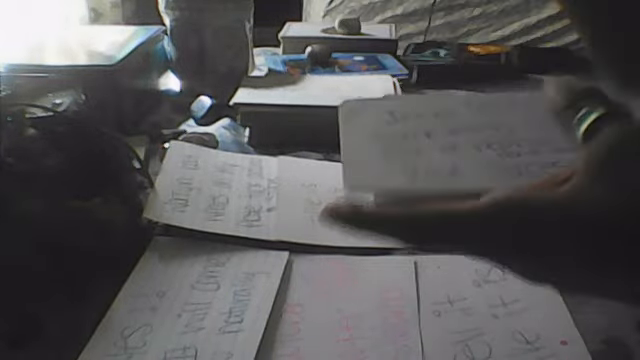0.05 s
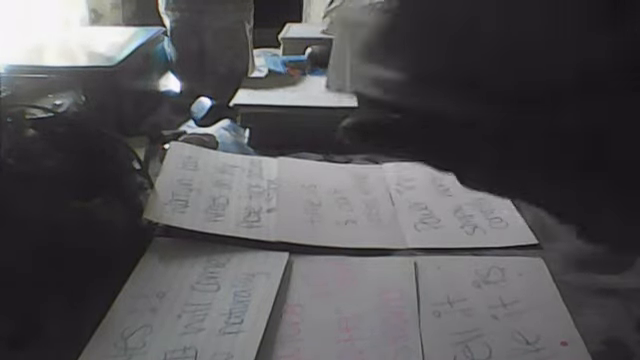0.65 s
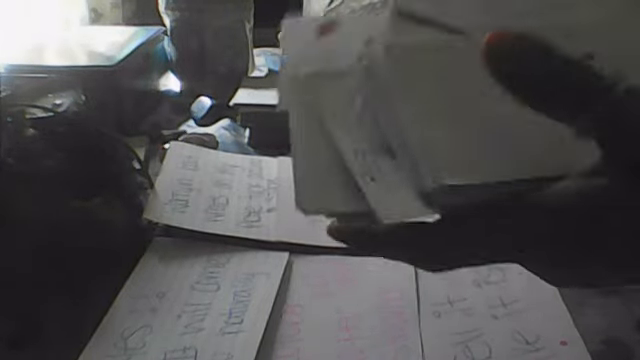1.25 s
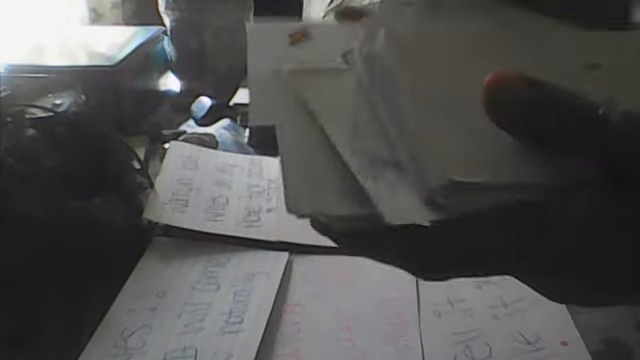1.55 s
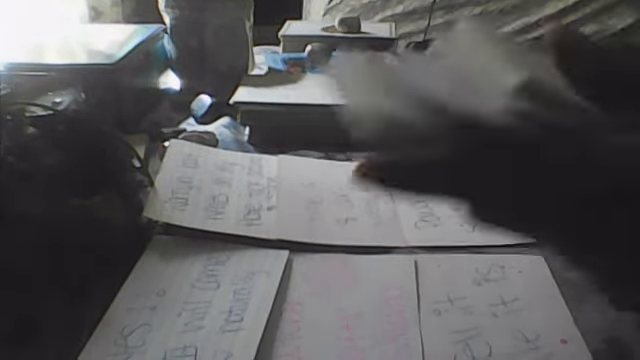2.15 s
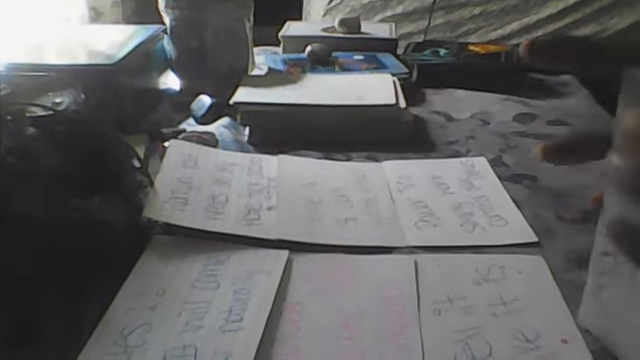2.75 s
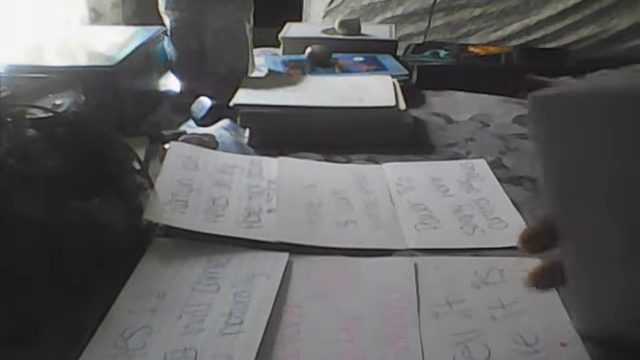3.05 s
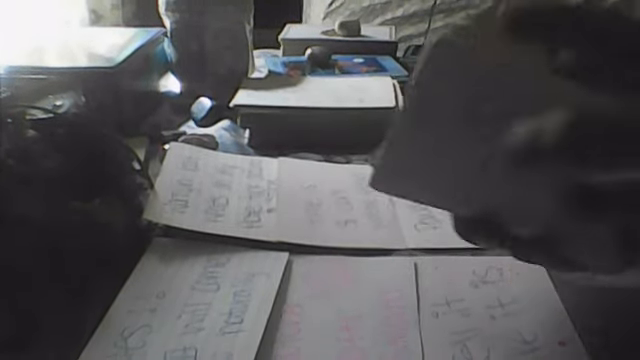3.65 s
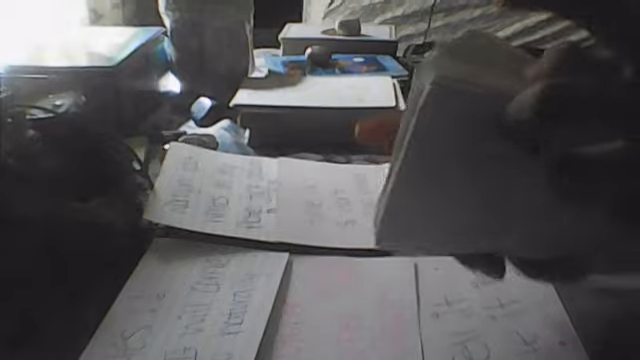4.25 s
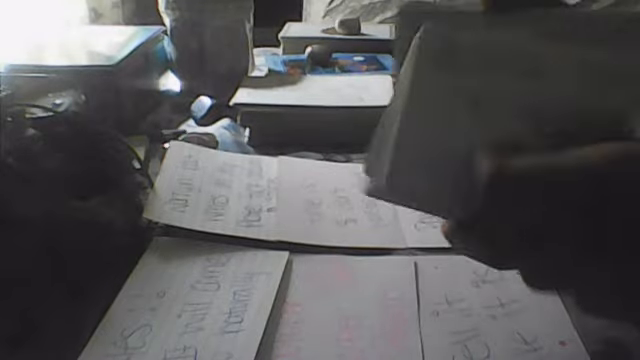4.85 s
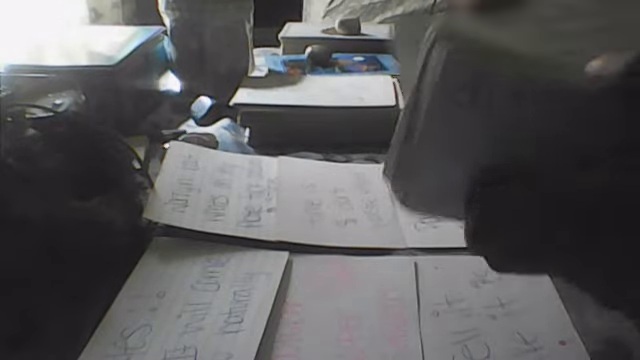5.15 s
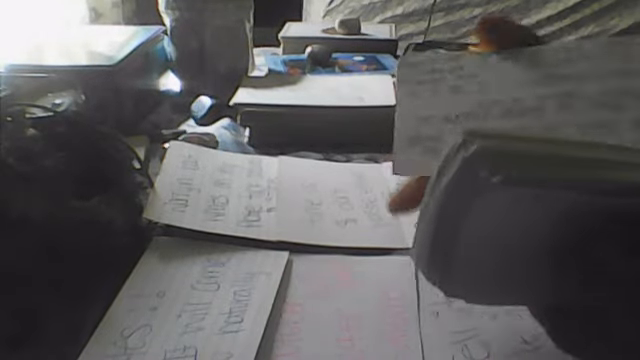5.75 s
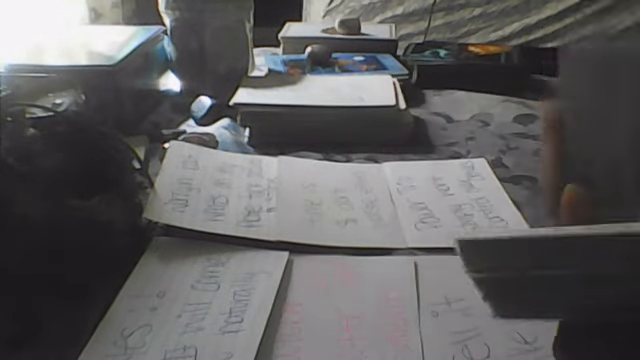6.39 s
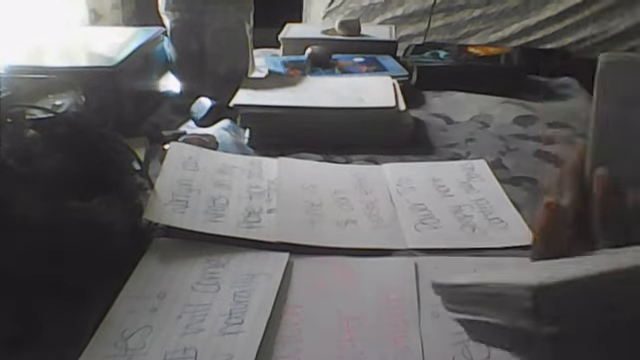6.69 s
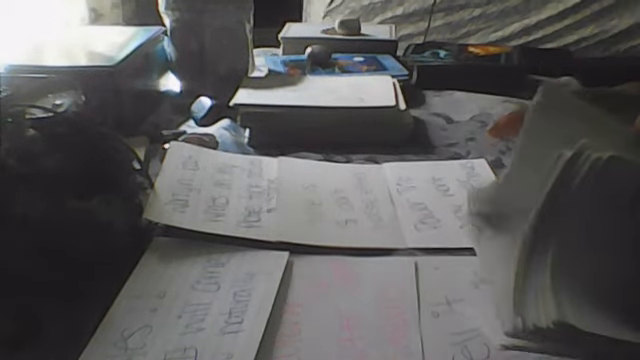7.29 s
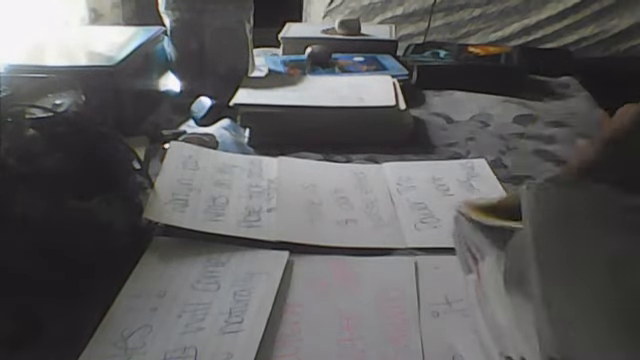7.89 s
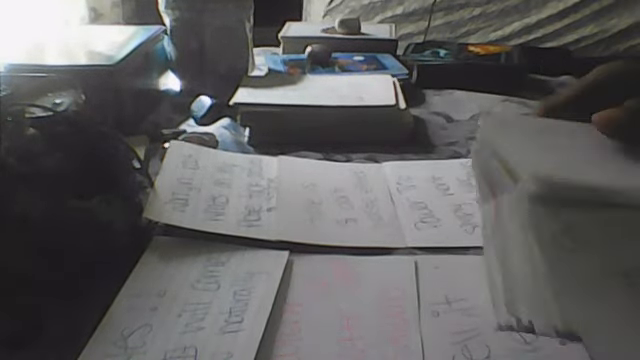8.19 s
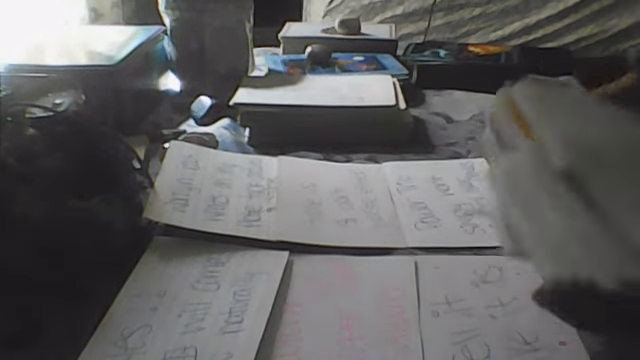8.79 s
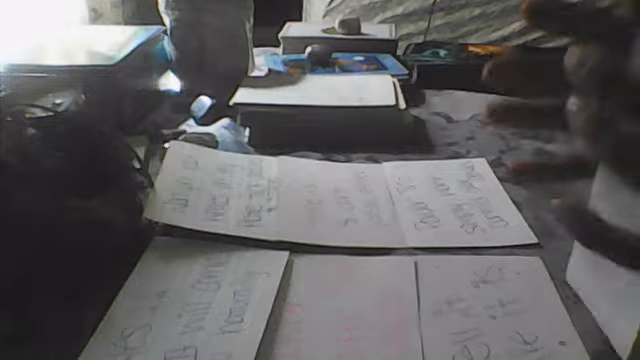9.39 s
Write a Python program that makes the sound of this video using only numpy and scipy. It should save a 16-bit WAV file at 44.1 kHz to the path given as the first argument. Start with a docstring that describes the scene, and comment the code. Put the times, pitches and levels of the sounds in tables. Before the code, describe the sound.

A fan hums low and steady in a small room throughout, while a deck of cards is handled close to a microphone standing on the table. For the first 2.4 seconds, cards slide over each other in short papery swishes, with small edge snaps and faint squeaks. At about 2.6 seconds the deck hits the table in a loud, quick clatter that briefly rings the top. From 3 to 6 seconds there is quieter shifting, with a few soft slides, ticks and tiny squeaks. Three solid knocks land at about 6.2, 6.4 and 6.7 seconds. From 7 to 8 seconds the cards rub and their edges snap in a crisp flurry, strongest near 7.8. Soft sliding continues until just after 9 seconds. At about 9.4 seconds the deck comes down on the table with a sharp, loud clack.

```python
"""Tarot cards handled on a table.

Packets slide with a hiss of catching fibres, faces squeak faintly, edges slip free and snap.
The deck is knocked and set down, ringing the table top on which the small, close microphone stands.
A fan hums steadily in the small room; the recorder's gain dips after the loudest knocks."""
import sys
import numpy as np
from scipy import signal
from scipy.fft import rfft, irfft
from scipy.io import wavfile
from scipy.ndimage import uniform_filter1d

SR = 44100
rng = np.random.default_rng(int(sys.argv[2]) if len(sys.argv) > 2 else 0)


def to_wav(sig):
    """Store sig (one row per channel, or 1-D mono) as 16-bit WAV at the path in sys.argv[1].

    Samples outside -1..1 are clipped; the rate is SR.
    """
    pcm = np.clip(np.atleast_2d(sig), -1, 1) * 32767
    pcm = np.round(pcm).astype(np.int16)
    wavfile.write(sys.argv[1], SR, pcm.T)  # frames by channels


N = 420273

# Spectrum of a snapping card edge. Each row: frequency in Hz, relative density in dB.
EDGE_SPECTRUM = [(500, 8), (2000, 6.5), (3500, 4), (5500, 4.5), (7500, 1), (10000, -0.5), (14000, -0.5)]
# Spells of fingers lightly shifting the cards. Each row: start in seconds, end in seconds, level in dB.
SHIFT_SPELLS = [(0.792, 1.2, -68), (2.784, 3.417, -57), (4.144, 4.5, -60), (4.985, 5.2, -63),
                (5.38, 5.55, -60.5), (6.493, 6.648, -57.5), (6.821, 7.072, -59.5), (7.298, 7.716, -57),
                (7.953, 8.256, -55), (8.55, 8.87, -59)]


def undb(db):
    """Decibels to gain."""
    return 10 ** (np.asarray(db) / 20)


def unit(x):
    """Scale to rms 1."""
    return x / np.sqrt(np.mean(x ** 2))


def fade(t, t60_s):
    """Decay by 60 dB in t60_s."""
    return np.exp(-np.log(1000) * t / max(t60_s, 1e-4))


def add(track, start_s, sound):
    """Mix a sound into the track."""
    i = max(int(start_s * SR), 0)
    track[i:i + len(sound)] += sound[:max(N - i, 0)]


def colour(x, points, size=4096):
    """Minimum-phase filter of unit power, shaped by (Hz, dB) points."""
    hz, db = np.transpose(points)
    bins_hz = np.arange(size // 2 + 1) * SR / size + 1
    gain = undb(np.interp(np.log(bins_hz), np.log(hz), db))
    cepstrum = irfft(np.log(gain))
    cepstrum[1:size // 2] *= 2
    cepstrum[size // 2 + 1:] = 0
    response = irfft(np.exp(rfft(cepstrum)))
    return signal.fftconvolve(x, response / np.linalg.norm(response))[:len(x)]


def resonate(x, hz, width_hz):
    """One resonance, gain 1 at its centre."""
    return signal.lfilter(*signal.iirpeak(min(hz, .45 * SR), hz / width_hz, fs=SR), x)


def band(x, hz, width_hz):
    """Two equal resonances in series."""
    return resonate(resonate(x, hz, width_hz), hz, width_hz)


def lowpass(x, hz, order=2):
    """Butterworth low-pass."""
    return signal.lfilter(*signal.butter(order, min(hz, .45 * SR), fs=SR), x)


def walk(rate_hz):
    """Smooth random wander, rms 1."""
    hold = max(int(SR / rate_hz), 1)
    steps = np.repeat(rng.standard_normal(N // hold + 1), hold)
    return unit(uniform_filter1d(steps, hold)[:N])


def fan(shaft_hz=43.59, drift=.0012, flutter_db=1.63, air_db=-48):
    """Shaft and blade tones over rushing air; the lowest tones flutter least."""
    # Fan tones. Each row: multiple of the shaft rate, rms level in dB.
    tones = [(1, -40.5), (2, -49), (4, -61), (6, -59.5), (8, -53), (8.25, -60), (9.5, -75.5), (10, -53),
             (10.5, -62), (12, -68), (14, -61.5), (18, -69)]
    # Fan air and microphone hiss. Each row: frequency in Hz, relative density in dB.
    air_spectrum = [(40, -6.5), (125, -2), (165, -2.5), (215, 0.5), (330, 0.5), (430, 2), (520, -2),
                    (640, 1), (800, -6.5), (1050, -4.5), (1200, -11.5), (1400, -6), (1750, -13),
                    (3200, -16.5), (7000, -26.5), (15000, -25.5)]
    # Low resonances stirred by the draught. Each row: centre in Hz, width in Hz, rms level in dB.
    rumbles = [(26.5, 9.9, -45.5), (58.7, 3.1, -51.5), (85.3, 32, -53.5), (392, 62, -57), (928, 255, -58)]
    angle = 2 * np.pi * np.cumsum(shaft_hz * (1 + drift * walk(3.054))) / SR
    out = undb(air_db) * colour(rng.standard_normal(N), air_spectrum)
    for multiple, db in tones:
        wobble_db = flutter_db * min(multiple / 4, 1) * walk(7.7)
        out += undb(db + wobble_db) * np.sqrt(2) * np.sin(multiple * angle + rng.uniform(0, 2 * np.pi))
    for hz, width_hz, db in rumbles:
        out += undb(db) * unit(band(rng.standard_normal(N), hz, width_hz))
    return out


def room(x, wet_db=-14, t60_s=0.38, gap_s=0.00317):
    """A small furnished room answers after a short gap."""
    # Room tail. Each row: frequency in Hz, relative density in dB.
    tail_spectrum = [(60, 4), (150, 8.5), (400, 6.5), (850, 6), (1400, 2), (3000, 3.5), (7000, 4),
                     (16000, -1)]
    t = np.arange(SR // 2) / SR
    tail = colour(rng.standard_normal(len(t)), tail_spectrum) * fade(t, t60_s) * (t > gap_s)
    return undb(wet_db) * signal.fftconvolve(x, tail / np.linalg.norm(tail))[:N]


def squeaks():
    """Card faces stick and slip unevenly: a hoarse, narrow tone swells and fades."""
    # Squeaks. Each row: middle and half-height length in seconds, centre and width in Hz, level in dB.
    chirps = [(.27, 0.33, 1108, 50, -52), (0.554, .012, 1120, 350, -38.5), (0.586, 0.055, 1420, 150, -50),
              (4.427, .04, 2230, 400, -48.5), (4.71, 0.013, 1450, 200, -43.5)]
    out = np.zeros(N)
    for middle_s, length_s, hz, width_hz, db in chirps:
        swell = np.hanning(int(2 * length_s * SR))
        tone = unit(band(rng.standard_normal(len(swell)), hz, width_hz))
        add(out, middle_s - length_s, undb(db) * swell * tone)
    return out


def packet(x):
    """The broad ring of a packet of cards held in the hand."""
    # Packet resonances. Each row: centre in Hz, width in Hz, gain in dB.
    modes = [(760, 325, 19.5), (1320, 280, 22), (2080, 250, 13.5), (2260, 510, -15.5), (2690, 480, -12)]
    ring = sum(undb(db) * resonate(x, hz, width_hz) for hz, width_hz, db in modes)
    return lowpass(ring, 4300, order=4)


def rub(speed, pressure, face_db=1, grain_db=3, judder_db=2.0, grip_db=2.2, snags_per_s=45, snag_s=.0007):
    """Fibres catch and slip, edges snag; speed sets the hiss, pressure the packet's ring."""
    # Smooth faces rubbing. Each row: frequency in Hz, relative density in dB.
    face_spectrum = [(3000, -61), (6500, -4), (9000, -1.5), (14000, -0.5)]
    # Free edges scraping. Each row: centre in Hz, width in Hz, relative level in dB.
    edge_bands = [(2580, 2800, -11), (5400, 5000, -7), (11500, 5900, -11)]
    snag_onsets = (rng.random(N) < snags_per_s / SR) * rng.uniform(1, 4, N)
    snags = signal.lfilter([1], [1, -np.exp(-1 / (snag_s * SR))], snag_onsets)
    ticks = rng.standard_normal(N) * (1 + snags)
    ticks *= undb(grain_db * rng.standard_normal(N) + judder_db * walk(160))
    hiss = undb(face_db) * unit(colour(ticks, face_spectrum))
    for hz, width_hz, db in edge_bands:
        catches = ticks * rng.choice([-1, 1], N)
        grip = undb(db + grip_db * walk(30.2))  # each edge comes and goes as the grip changes
        hiss += grip * unit(band(catches, hz, width_hz))
    return speed * hiss + pressure * unit(packet(ticks))


def slides(shift_fade_s=0.054, shift_wander_db=2, shift_pressure_db=-1):
    """Strokes speed up and stop in a bell shape; in spells the fingers shift the cards unevenly."""
    # Cards sliding over each other. Each row: time of top speed in seconds, length in seconds,
    # hiss in dB, pressure in dB relative to the hiss.
    strokes = [(0.254, 0.032, -44, -6), (0.302, 0.021, -39, -13), (0.422, 0.16, -47, -2),
               (.63, .04, -35.5, -1.5), (0.726, 0.047, -37.5, -11), (0.773, 0.03, -31.5, -15),
               (1.022, 0.11, -39.5, -3), (1.483, 0.05, -37.5, -7), (1.842, .032, -35.5, -7),
               (2.152, 0.0085, -35, -3), (2.231, .04, -53, -1), (2.394, 0.015, -44.5, -8),
               (3.42, 0.041, -47, -1.5), (4.432, 0.041, -58, 7), (4.73, 0.08, -42, -21),
               (4.864, 0.068, -44, -10), (4.969, .03, -48, -17), (5.609, .026, -38.5, -10),
               (6.331, 0.038, -49.5, -4), (7.236, 0.068, -46.5, 10.5), (7.842, 0.095, -42, 8.5),
               (7.95, 0.023, -39, -7), (8.274, 0.19, -49, -5), (8.808, 0.1, -52.5, 1.5),
               (9.074, 0.08, -41, -13)]
    speed, pressure, shifting = np.zeros((3, N))
    for middle_s, length_s, db, pressure_db in strokes:
        t = np.arange(-2 * length_s, 2 * length_s, 1 / SR)
        stroke = undb(db) * np.exp(-2 * np.sqrt(2) * (t / length_s) ** 2)
        add(speed, middle_s + t[0], stroke)
        add(pressure, middle_s + t[0], undb(pressure_db) * stroke)
    for start_s, end_s, db in SHIFT_SPELLS:
        shifting[int(start_s * SR):int(end_s * SR)] = undb(db)
    shifting = uniform_filter1d(shifting, int(shift_fade_s * SR)) * undb(shift_wander_db * walk(24))
    return rub(np.hypot(speed, shifting), np.hypot(pressure, undb(shift_pressure_db) * shifting))


def clack(hz, t60_s, rise_s, width_hz, body_db, size=4096):
    """Many cards meet within a few ms and ring the packet; energy equals 10 ms at rms 1."""
    t = np.arange(size) / SR
    contacts = rng.standard_normal(size) * fade(t, t60_s) * (1 - np.exp(-t / rise_s))
    ring = band(contacts, hz, width_hz) + undb(body_db) * packet(contacts)
    return ring * np.sqrt(SR / 100) / np.linalg.norm(ring)


def stray_ticks(ticks_per_s=6, above_spell_db=3, spread_db=2, body_db=-5):
    """Edges tick faintly at random while the fingers shift the cards; returns rows for clicks()."""
    rows = []
    for start_s, end_s, db in SHIFT_SPELLS:
        for tick_s in rng.uniform(start_s, end_s, round(ticks_per_s * (end_s - start_s))):
            edge_db = db + above_spell_db + spread_db * rng.standard_normal()
            rows.append((tick_s, edge_db, edge_db + body_db, edge_db + body_db))
    return rows


def clicks(snap_gain_db=10, thud_gain_db=-2, chatter_db=-15, peel_s=0.00043, db_per_octave=33):
    """An edge peels free: a bright snap, its neighbours' chatter, a packet ring, a thud in the hand."""
    # Edge snaps and taps. Each row: start in seconds, then snap, ring and thud in dB before the gains.
    taps = [(.2327, -50, -44, -33.5), (.2932, -34, -39, -35.5), (.5493, -75, -50, -38),
            (.6103, -31.5, -32, -29), (.6298, -31.5, -34, -25.5), (.7814, -26.5, -34.5, -30),
            (.7904, -36, -29, -29), (.88, -40, -44, -42), (1.0752, -38, -37.5, -41),
            (1.2587, -48, -62, -59), (1.5432, -46, -44.5, -57), (1.8272, -44, -55, -39.5),
            (2.136, -34.5, -38.5, -44), (2.1504, -29.5, -49, -46), (2.3875, -43, -44.5, -39),
            (4.1477, -35.5, -58, -50), (4.1603, -41.5, -38, -27.5), (4.3158, -61, -46.5, -40),
            (4.4579, -52.5, -38.5, -30.5), (4.7258, -39, -55, -56), (5.616, -36, -43, -34),
            (7.064, -41, -49.5, -36.5), (7.2087, -37, -40, -41), (7.2331, -30.5, -30.5, -39),
            (7.2406, -39.5, -26.5, -35), (7.276, -36, -25.5, -34), (7.4414, -38, -60, -53),
            (7.4724, -56, -39, -28), (7.5755, -39.5, -49, -42), (7.6672, -47, -44, -55),
            (7.6985, -45, -40, -46), (7.7049, -34.5, -43, -42), (7.7333, -30, -30.5, -30.5),
            (7.7836, -33.5, -47, -49), (7.7976, -21.5, -44, -44), (7.8339, -35, -21.5, -35),
            (7.8425, -23.5, -30, -33), (7.854, -39, -26.5, -26.5), (7.8723, -38, -41, -35)]
    t = np.arange(SR // 10) / SR
    peel = 1 - np.exp(-t / peel_s)
    decay = fade(t, 0.0071) + undb(chatter_db) * fade(t, 0.055)
    snaps, body = np.zeros((2, N))
    for start_s, edge_db, packet_db, hand_db in taps + stray_ticks():
        snap, push = rng.standard_normal((2, len(t)))
        add(snaps, start_s, undb(edge_db + snap_gain_db) * snap * peel * decay)
        # More snap and less packet: a shorter free edge, which rings higher.
        ring_hz = 1793 * 2 ** ((edge_db - packet_db) / db_per_octave)
        ring = clack(ring_hz, t60_s=0.022, rise_s=0.00035, width_hz=480, body_db=-22)
        add(body, start_s, undb(packet_db) * ring)
        thud = lowpass(resonate(push * fade(t, 0.03), hz=400, width_hz=770), hz=570)
        add(body, start_s, undb(hand_db + thud_gain_db) * thud / np.std(thud[:SR // 100]))
    return body + colour(snaps, EDGE_SPECTRUM)


def knocks(low_hz=220, detune=.025, place_db=3.5, slap_db=-7, rattle_db=-36.5, rattle_peak_s=0.0082):
    """Blows ring the table, duller for softer contact; the deck clacks, cards slap, loose edges settle."""
    # Deck striking the table. Each row: start in seconds, blow in dB, contact cut-off in Hz,
    # weight on the low modes in dB, clack in dB, clack centre in Hz.
    blows = [(2.6358, 2.5, 1740, 1, -19.5, 1190), (2.668, -3, 1400, -28, -27, 1400),
             (2.673, -1, 1010, 4, -21, 820), (2.696, -6, 1850, -7, -22, 1290),
             (6.193, -14, 2200, -18, -31.5, 2110), (6.1998, -1.5, 624, 1, -22.5, 970),
             (6.4327, 3, 664, 0.5, -22, 1130), (6.695, 3, 1440, -3, -18.5, 1120),
             (9.371, -20, 1500, -8, -42, 1500), (9.380, -3.5, 1680, -23, -30, 1290),
             (9.3846, -16, 900, 16.5, -31, 2850), (9.3959, -10.5, 2200, -3, -18, 2720),
             (9.4006, 5, 1700, -7, -9, 1210), (9.422, -10, 1500, -6, -28, 1390)]
    # Table top with the deck on it. Each row: frequency in Hz, relative level in dB, T60 in seconds.
    table_modes = [(59.1, -21.5, 0.49), (88.4, -15, 0.15), (116.3, -13, 0.097), (140, -15.5, 0.15),
                   (199, -29, 0.045), (234.5, -19.5, 0.061), (262.4, -23.5, 0.19), (318.5, -18.5, 0.076),
                   (341.4, -22, 0.11), (358, -20.5, 0.11), (458, -30.5, .07), (509, -20.5, 0.087),
                   (634, -18, 0.034), (773, -15.5, 0.043), (817, -16.5, 0.052), (1150, -26, 0.055),
                   (1208, -23, 0.14), (1636, -18, 0.055), (1800, -20, 0.046)]
    # Flat cards slapping together. Each row: frequency in Hz, relative density in dB.
    slap_spectrum = [(150, -5), (500, 2), (1250, -11), (2000, 10), (3000, -8), (4200, -41), (12000, -49)]
    t = np.arange(SR // 2) / SR
    lowness = 1 / (1 + (np.array(table_modes)[:, 0] / low_hz) ** 4)
    settle = np.sqrt(t / rattle_peak_s) * np.exp(-(t / rattle_peak_s / 2) ** 2)
    wood, slaps, rattle = np.zeros((3, N))
    for start_s, db, contact_hz, weight_db, clack_db, clack_hz in blows:
        modes = []
        for hz, mode_db, t60_s in table_modes:
            loaded_hz = hz * (1 + detune * rng.standard_normal())  # hand and deck load the table
            modes.append(undb(mode_db) * np.cos(2 * np.pi * loaded_hz * t) * fade(t, t60_s))
        # The landing spot decides which higher modes speak.
        spot_db = place_db * (1 - lowness) * rng.standard_normal(len(modes))
        table_ring = undb(weight_db * lowness + spot_db) @ np.array(modes)
        add(wood, start_s, -undb(db) * lowpass(table_ring, contact_hz, order=4))
        deck_ring = clack(clack_hz, t60_s=0.019, rise_s=0.003, width_hz=340, body_db=-46.5)
        add(wood, start_s, undb(clack_db) * deck_ring)
        add(slaps, start_s, undb(clack_db + slap_db) * rng.standard_normal(len(t)) * fade(t, 0.06))
        add(rattle, start_s, undb(db + rattle_db) * rng.standard_normal(len(t)) * settle)
    rattle *= undb(4 * walk(400))  # edges settle unevenly
    return wood + colour(slaps, slap_spectrum) + colour(rattle, EDGE_SPECTRUM)


def scene():
    """Cards and table in the room, over the fan; mono."""
    hum = fan()
    cards = knocks() + slides() + squeaks() + clicks()
    return (cards + room(cards) + hum)[None]


def record(dry, duck_db=3, sense_s=0.03, recover_s=0.39, loud_rms=0.31, top_hz=15750):
    """Gain control backs off after loud sounds and recovers slowly; peaks clip and the top is cut."""
    smoothing = 1 / (sense_s * SR)
    power = signal.lfilter([smoothing], [1, smoothing - 1], dry ** 2)
    t = np.arange(N) / SR
    release = np.exp(-t / recover_s)
    held_rms = np.maximum.accumulate(np.sqrt(power) / release, axis=-1) * release
    limited = np.clip(dry * undb(-duck_db * held_rms / loud_rms), -1, 1)
    return signal.sosfilt(signal.ellip(10, .2, 70, top_hz, fs=SR, output="sos"), limited)


dry = scene()
out = record(dry)
to_wav(out)
```